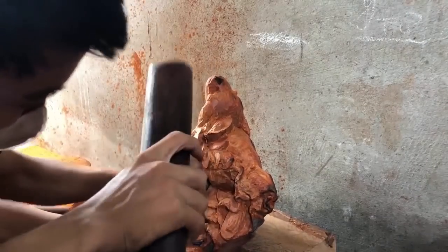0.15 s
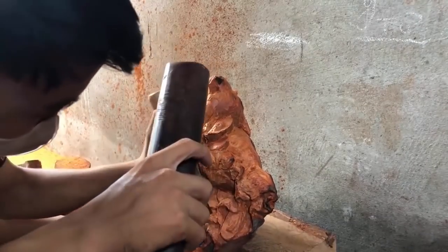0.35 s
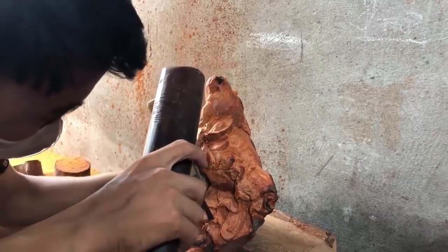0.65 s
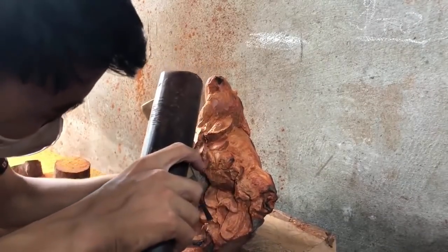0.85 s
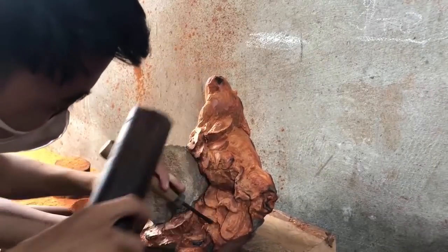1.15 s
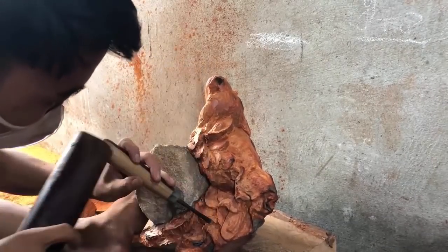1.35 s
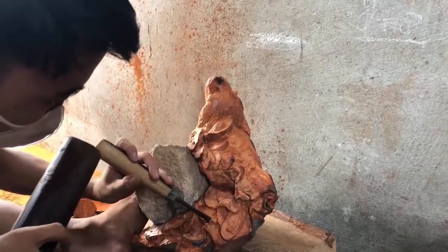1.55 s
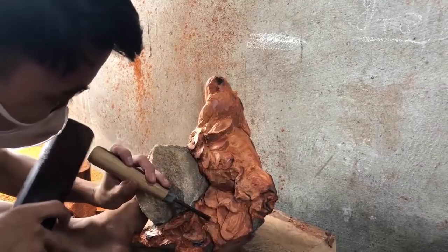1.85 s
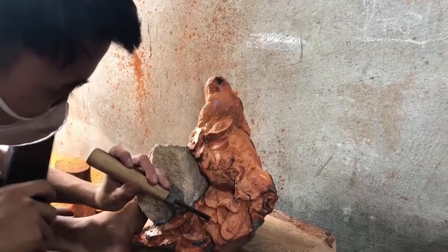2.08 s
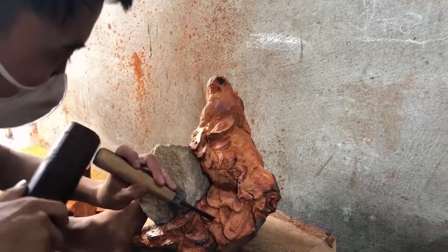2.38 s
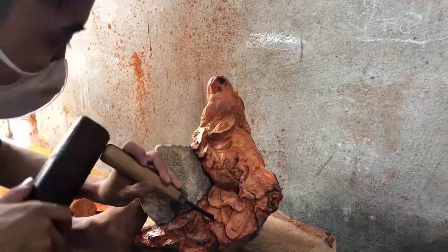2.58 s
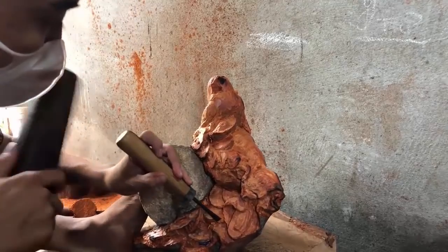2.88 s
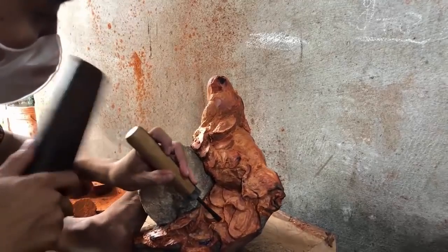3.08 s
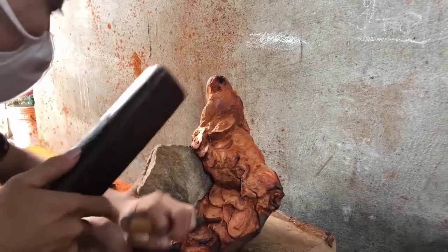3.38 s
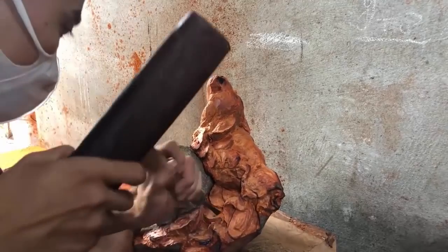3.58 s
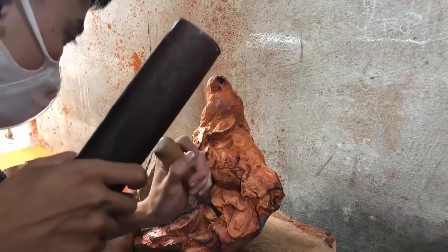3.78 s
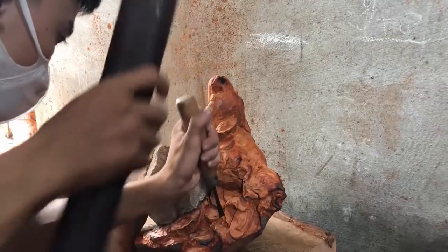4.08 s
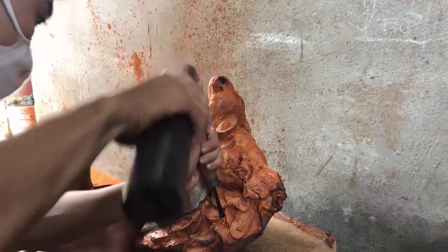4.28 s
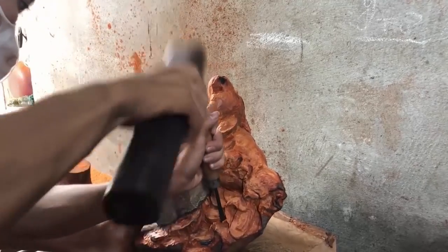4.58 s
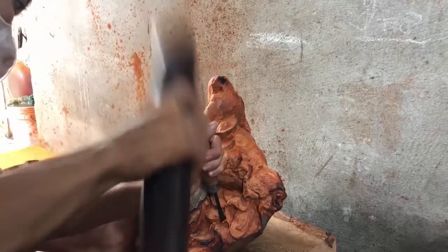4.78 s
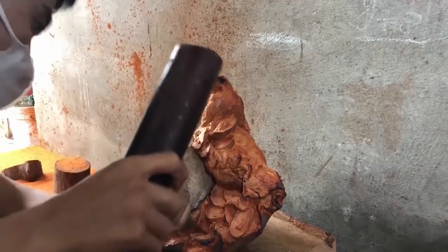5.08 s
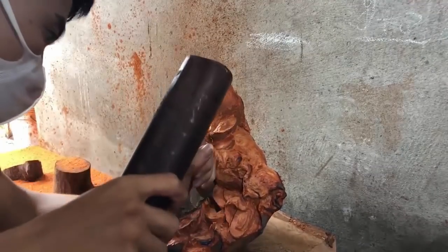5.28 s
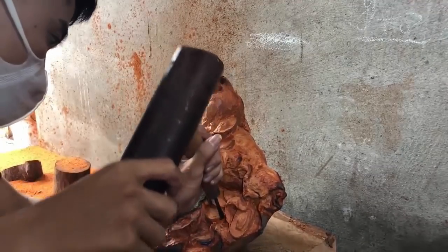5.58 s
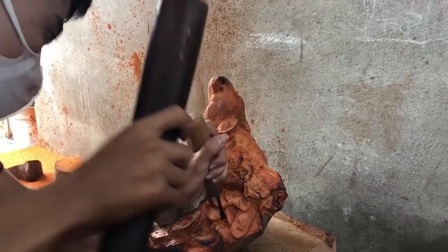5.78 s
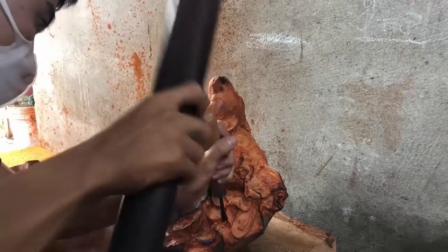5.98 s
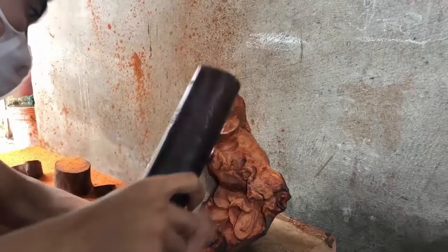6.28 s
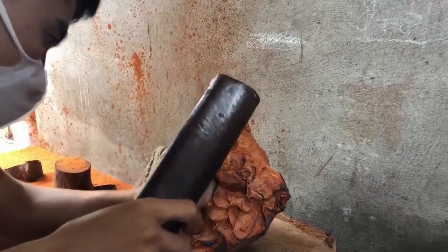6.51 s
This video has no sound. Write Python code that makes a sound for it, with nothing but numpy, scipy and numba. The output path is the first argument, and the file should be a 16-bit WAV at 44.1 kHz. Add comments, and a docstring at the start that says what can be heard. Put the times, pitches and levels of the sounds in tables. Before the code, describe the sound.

A heavy wooden mallet drives a chisel into hardwood, close to the microphone in a bare workshop. Each blow is a sharp, loud crack of wood with a short high ring of steel and a tight reflection off nearby walls. A single blow lands right at the start. A lull follows, with very faint low bumps of hands on the wood and a light tool tick at about 1.2 seconds. From 2.2 to 3.2 seconds come six quick, even blows, about five a second, with a slightly higher ring. After a pause, three blows with a lower ring fall at about 4.3, 4.6 and 4.9 seconds, and two more at 5.9 and 6.2 seconds. A few tiny steel ticks sit between and after these last groups. Quiet room tone and the faint, gusty rumble of a draught on the microphone continue underneath until the end, at about 6.6 seconds.

```python
"""Woodcarving in a bare workshop

Close to a phone's microphone, a carver drives two chisels into a hardwood figure with a heavy wooden
mallet. Each blow is a crack of wood plus the chisel's short ring; the walls answer some 15 ms later.
Tools tick, hands bump the figure, a draught buffets the microphone and a limiter flattens the blows."""
import sys
import numpy as np
from scipy import signal
from scipy.fft import rfft, irfft
from scipy.io import wavfile
from scipy.ndimage import uniform_filter1d, minimum_filter1d, map_coordinates
from numba import njit

SR = 44100
rng = np.random.default_rng(int(sys.argv[2]) if len(sys.argv) > 2 else 0)


def to_wav(sig):
    """Store sig (one row per channel, or 1-D mono) as 16-bit WAV at the path in sys.argv[1].

    Samples outside -1..1 are clipped; the rate is SR.
    """
    pcm = np.clip(np.atleast_2d(sig), -1, 1) * 32767
    pcm = np.round(pcm).astype(np.int16)
    wavfile.write(sys.argv[1], SR, pcm.T)  # frames by channels


N = 293265

# Room tone; all levels in these tables are relative. Each row: frequency in Hz, level in dB.
ROOM_TONE_COLOUR = [(150, -37.5), (250, -7), (378, -6.5), (405, -4.5), (593, -7.5), (945, -10.5),
                    (1180, -6.5), (1480, -9.5), (2160, -11.5), (2760, -15), (6540, -22), (8920, -29.5),
                    (15500, -31.5)]
# The room tone sinks and returns. Each row: time in seconds, level in dB.
ROOM_TONE_LEVEL = [(0, -46.5), (.35, -59), (1.2, -51.5), (2.2, -50), (3.5, -53), (4.1, -50), (5.9, -50),
                   (6.45, -58)]
# Wind on the microphone. Each row: frequency in Hz, level in dB.
WIND_COLOUR = [(20, -39), (40, 0.5), (60, 6), (90, 3.5), (130, -3.5), (200, -12), (320, -32), (700, -74)]
# The draught between gusts. Each row: time in seconds, level in dB.
DRAUGHT_LEVEL = [(0.0, -50), (0.16, -51.5), (0.61, -43.5), (0.91, -47.5), (1.24, -39.5), (1.63, -45),
                 (1.93, -38.5), (3.41, -46), (3.83, -39.5), (4.13, -40), (4.31, -43.5), (5.35, -41),
                 (5.48, -41), (5.98, -45.5), (6.33, -50), (6.65, -50.5)]
# The strongest gusts. Each row: start in seconds, peak level in dB.
GUSTS = [(0.481, -28), (1.064, -24.5), (1.263, -21.5), (1.559, -31), (1.78, -25.5), (2.208, -29),
         (2.954, -23), (3.637, -26), (4.123, -22), (4.334, -21), (5.048, -30), (5.352, -20.5),
         (5.79, -27.5), (5.951, -30.5)]
# Mallet blows on each chisel. Each row: start in seconds, force in dB, boosts of the knock, ring and
# overtone in dB, brightness of the crack in dB per octave, pitch of the wood in Hz.
BROAD_BLOWS = [(.0518, -1.5, 1, 4.5, 10.5, 0, 1640), (4.3202, 1.5, -4.5, 7.5, -29.5, -1.4, 1490),
               (4.5652, 2, 7, -3, -1, 0, 1560), (4.8652, 0.5, 6, -39, 9.5, 0.2, 1770),
               (5.9147, -0.5, 5.5, 2.5, 4, 0, 1627), (6.1748, -1, 0, 6, -35, 1, 1592)]
NARROW_BLOWS = [(2.2072, -1.5, 5, 6, -26.5, -1.4, 1610), (2.4129, 3.5, 7, 8.5, 0.5, -0.45, 1717),
                (2.6153, 5, -2.5, 9.5, 4, 1, 1600), (2.8144, 2.5, -4, 11, -4.5, 0.9, 1569),
                (3.0267, 4, -5.5, -3, 3, -0.56, 1847), (3.2213, 4.5, -8, -12, 2.5, -0.3, 1690)]
# Chisel modes, knock, ring and overtone first. Each row: frequency in Hz, level in dB, t60 in seconds.
BROAD_MODES = [(1187, -1, 0.028), (2927, 1.5, 0.024), (4918, -9, 0.019), (840, -11.5, 0.017),
               (1758, -12.5, 0.037), (2083, -6.5, 0.025), (2390, -1, 0.013), (3090, -15, 0.032),
               (3696, -17, 0.034), (4190, -12.5, 0.02), (4613, -16.5, .035), (6100, -30.5, 0.036),
               (7770, -30.5, 0.021)]
NARROW_MODES = [(1445, -11, 0.064), (3377, -7.5, 0.037), (5566, -11.5, 0.022), (1947, -2, 0.0087),
                (3112, 3.5, 0.0053), (4480, -26, 0.03), (4466, -33, 0.015), (5340, -5, 0.0078),
                (5950, -30.5, 0.079), (8230, -49.5, 0.076)]
# The crack of mallet on handle and edge in wood. Each row: frequency in Hz, level in dB.
CRACK_COLOUR = [(100, -24), (300, -18), (620, -19), (950, -9), (1300, -6), (1750, -2), (2400, -4.5),
                (3200, -4), (5000, -7), (7000, -14.5), (11000, -19.5), (15500, -19.5), (18000, -40)]
# The workshop's reverberation. Each row: band centre in Hz, t60 in seconds, level in dB.
REVERB_BANDS = [(245, 0.28, 10.5), (796, 0.23, 3.5), (1230, 0.3, -0.5), (1540, 0.31, -1.5),
                (3160, 0.3, 1.5), (5770, 0.29, -2), (14000, 0.25, -3)]
# Echoes off the bench, the near walls, then the far ones. Each row: delay in seconds, level in dB.
ECHOES = [(0, -10), (.013, -7.5), (.0165, -6.5), (.0195, 1), (.023, -1), (.028, -2), (.036, 0),
          (.042, -0.5), (.05, -2)]
# Soft bumps of hands and figure. Each row: start in seconds, level in dB.
BUMPS = [(0.465, -38.5), (0.597, -41), (0.787, -40.5), (1.034, -36), (1.773, -34.5), (3.8, -32.5),
         (4.153, -37)]
# The dull thud of a bump. Each row: frequency in Hz, level in dB.
THUD_COLOUR = [(60, -23), (180, 4), (300, -2), (480, -12), (750, -13.5), (1300, -52), (4000, -66)]
# Light ticks of tools being handled. Each row: start in seconds, level in dB.
TICKS = [(0.7194, -55), (1.2021, -30.5), (1.5854, -54), (3.4994, -47), (5.1547, -40), (5.5258, -45),
         (6.3344, -39.5), (6.4544, -61.5)]
# The ring of the ticking steel. Each row: frequency in Hz, level in dB, t60 in seconds.
TICK_MODES = [(4320, 4.5, .02), (4550, -2, 0.037), (4700, -3, 0.029), (8200, -8, 0.056), (11800, -8, .03),
              (13600, -1, .02)]


def undb(db):
    """Decibels to gain."""
    return 10 ** (np.asarray(db) / 20)


def unit(x):
    """Scale to rms 1."""
    return x / np.sqrt(np.mean(x ** 2))


def curve(rows):
    """Join (seconds, value) rows by straight lines."""
    return np.interp(np.arange(N) / SR, *np.transpose(rows))


def clock(seconds):
    """Sample times of a short sound."""
    return np.arange(int(seconds * SR)) / SR


def fade(t, t60):
    """Exponential decay, 60 dB down at t60."""
    return np.exp(-np.log(1000) * t / t60)


def octaves(length):
    """Pitch of each spectrum bin in octaves."""
    return np.log2(np.fft.rfftfreq(length, 1 / SR) + 1)


def colour(x, outline, tilt_db=0):
    """Filter by a (Hz, dB) outline, tilted per octave about 2 kHz."""
    octave = octaves(len(x))
    hz, db = np.transpose(outline)
    gain_db = np.interp(octave, np.log2(hz), db) + tilt_db * (octave - np.log2(2000))
    return irfft(rfft(x) * undb(gain_db), len(x))


def add(track, start_s, sound):
    """Mix a sound into the track."""
    start = max(int(start_s * SR), 0)
    track[start:start + len(sound)] += sound[:N - start]


def wander(per_s):
    """Smooth random drift with a spread near 1."""
    steps = np.arange(N) / SR * per_s
    return unit(map_coordinates(rng.standard_normal(1000), [steps], order=3, mode="wrap"))


def room_tone(gain_db):
    """The faint, even rush of the workshop."""
    rush = unit(colour(rng.standard_normal(N), ROOM_TONE_COLOUR))
    return rush * undb(curve(ROOM_TONE_LEVEL) + gain_db)


def draught(between_gusts_db, gust_db, gust_rise_s=0.017, flutter_db=3.5):
    """Moving air rumbles on the microphone: small eddies flutter, gusts swell and fall."""
    rumble = unit(colour(rng.standard_normal(N), WIND_COLOUR))
    rumble /= np.sqrt(uniform_filter1d(rumble ** 2, size=5000))  # the wind alone sets the slow swell
    gusts, t = np.zeros(N), clock(.4)
    swell = t / gust_rise_s * np.exp(1 - t / gust_rise_s)
    for start_s, db in GUSTS:
        add(gusts, start_s, undb(db + gust_db) * swell)
    breeze = undb(curve(DRAUGHT_LEVEL) + between_gusts_db + flutter_db * wander(per_s=16))
    return rumble * np.hypot(breeze, gusts)


def ring(t, modes, detune=.002):
    """A struck tool's decaying modes; the grip shifts their pitch a little each time."""
    out = np.zeros(len(t))
    for hz, db, t60 in modes:
        hz *= 1 + detune * rng.standard_normal()
        out += undb(db) * fade(t, t60) * np.sin(2 * np.pi * hz * t + rng.uniform(0, 2 * np.pi))
    return out


def fibre_rattle(t, decay_s):
    """A dense rattle of wood fibres with equal energy at every frequency."""
    spectrum = rfft(rng.standard_normal(len(t)) * fade(t, decay_s))
    return irfft(spectrum / np.abs(spectrum), len(t))


def chisel(blows, modes, modes_db, wood_db, wood_t60, crack_db, crack_s, contact_s):
    """Close mallet blows: the chisel rings, the wood clacks and splits; all rise over the contact time."""
    out, t = np.zeros(N), clock(.5)
    attack = 1 - np.exp(-t / contact_s)
    for start_s, force_db, knock_db, ring_db, overtone_db, tilt_db, wood_hz in blows:
        struck = np.array([*modes, (wood_hz, wood_db, wood_t60)], float)
        struck[:3, 1] += knock_db, ring_db, overtone_db
        fibres = colour(fibre_rattle(t, crack_s), CRACK_COLOUR, tilt_db)
        crack = unit(fibres * fade(t, 2 * crack_s))
        blow = undb(modes_db) * ring(t, struck) + undb(crack_db) * crack
        # the carver moves, so every blow scatters through the room in its own way
        add(out, start_s, workshop(undb(force_db) * blow * attack))
    return out


def workshop(x, wet_db=-32.5):
    """The microphone hears the direct sound, bunches of echoes off bare walls, then a short tail."""
    t = clock(.5)
    noise, octave = rfft(rng.standard_normal(len(t))), octaves(len(t))
    centres = np.log2(np.array(REVERB_BANDS)[:, 0])
    response = np.zeros(len(t))
    for share, (_, t60, db) in zip(np.eye(len(REVERB_BANDS)), REVERB_BANDS):
        band = irfft(noise * np.interp(octave, centres, share), len(t))
        response += undb(db) * fade(t, t60) * band
    response *= undb(wet_db + np.interp(t, *np.transpose(ECHOES)))
    response[0] = 1  # direct sound
    return signal.fftconvolve(x, response)[:len(x)]


def hand_bumps(gain_db, rise_s=0.0028):
    """Hands bump the figure with soft, low thuds."""
    out, t = np.zeros(N), clock(.2)
    envelope = fade(t, t60=0.43) * (1 - np.exp(-t / rise_s))
    for start_s, db in BUMPS:
        thud = colour(fibre_rattle(t, decay_s=0.023), THUD_COLOUR)
        add(out, start_s, undb(db + gain_db) * unit(thud * envelope))
    return out


def tool_ticks(gain_db):
    """Steel touches the work lightly: a high ring and a click of noise."""
    out, t = np.zeros(N), clock(.2)
    for start_s, db in TICKS:
        tick = ring(t, TICK_MODES) + rng.standard_normal(len(t)) * fade(t, t60=0.027)
        add(out, start_s, undb(db + gain_db) * tick)
    return out


@njit
def follow_peaks(peaks, release):
    """Envelope that jumps to each peak and sinks back."""
    out, level = np.empty(len(peaks)), 0.
    for i in range(len(peaks)):
        level = max(peaks[i], level * release)
        out[i] = level
    return out


def limiter(x, ceiling, release_s):
    """Turns down just ahead of each peak, holds for about 8 ms and recovers quickly."""
    envelope = follow_peaks(np.abs(x), np.exp(-1 / (release_s * SR)))
    gain = ceiling / np.maximum(envelope, ceiling)
    held = minimum_filter1d(gain, size=380, origin=165)
    return x * uniform_filter1d(held, size=45)


def scene():
    """At the microphone, in mono: both chisels and the handling, over draught and room tone."""
    broad = chisel(BROAD_BLOWS, BROAD_MODES, modes_db=-2.5, wood_db=6.0, wood_t60=0.014,
                   crack_db=-27.5, crack_s=0.023, contact_s=0.00058)
    narrow = chisel(NARROW_BLOWS, NARROW_MODES, modes_db=-2.0, wood_db=3.0, wood_t60=0.013,
                    crack_db=-31.0, crack_s=0.022, contact_s=0.00048)
    handling = workshop(tool_ticks(gain_db=-15.0) + hand_bumps(gain_db=-21.5))
    background = draught(between_gusts_db=3.5, gust_db=-6) + room_tone(gain_db=-2.5)
    return (broad + narrow + handling + background)[None]


def record(dry):
    """The phone limits the close blows, rounds off the peaks that remain and cuts the top."""
    limited = limiter(dry[0], ceiling=.9, release_s=.007)
    rounded = limited / (1 + (limited / .74) ** 4) ** (1 / 4)
    lowpass = signal.ellip(8, .2, 70, 15800, fs=SR, output="sos")
    return signal.sosfilt(lowpass, rounded)[None]


dry = scene()
out = record(dry)
to_wav(out)
```